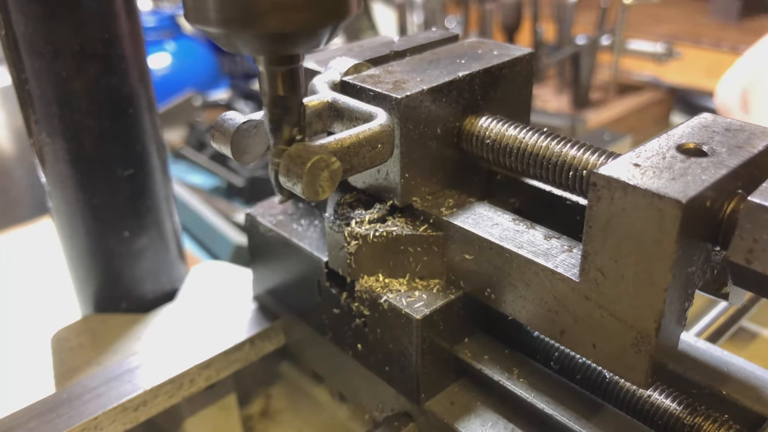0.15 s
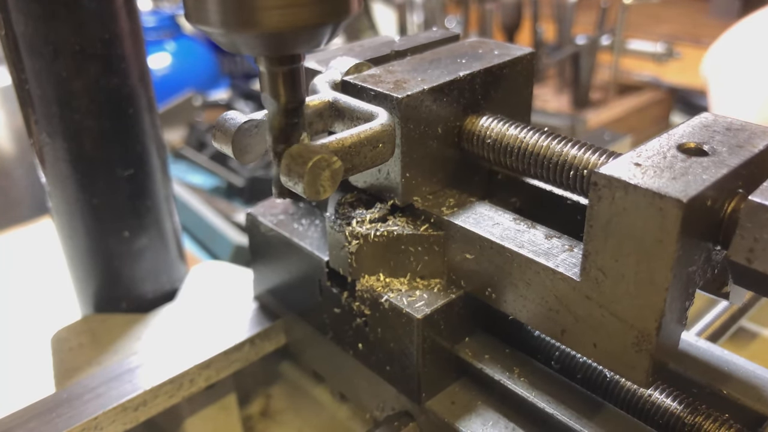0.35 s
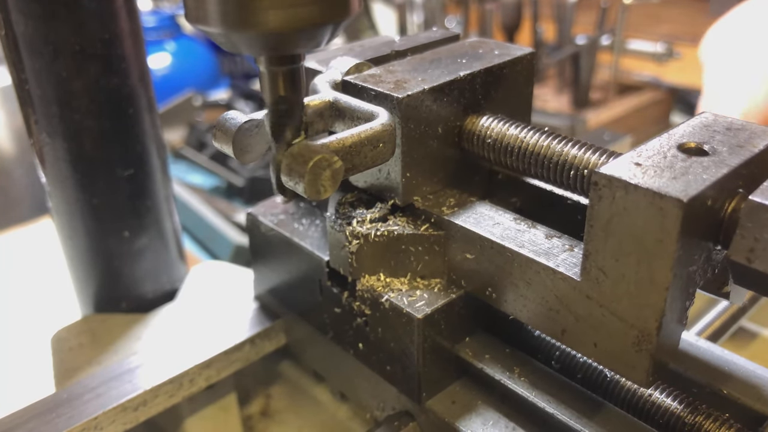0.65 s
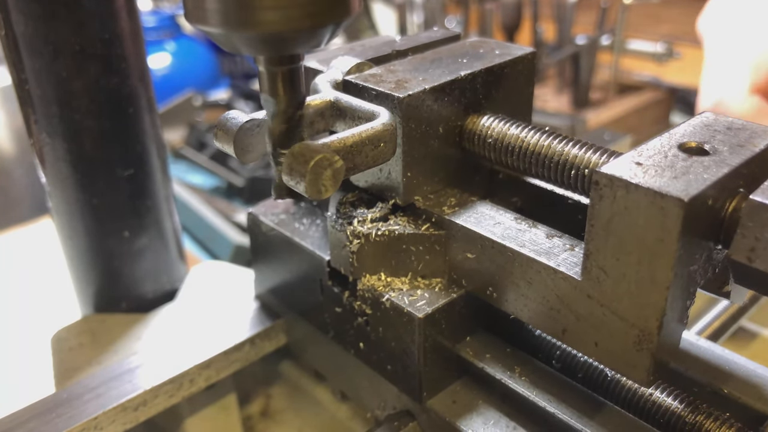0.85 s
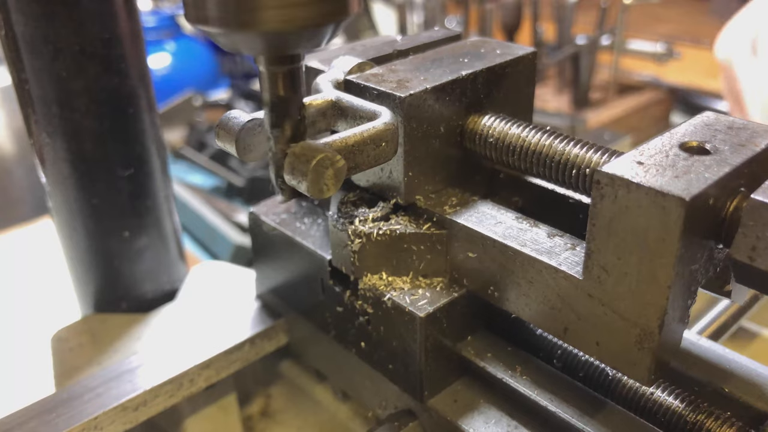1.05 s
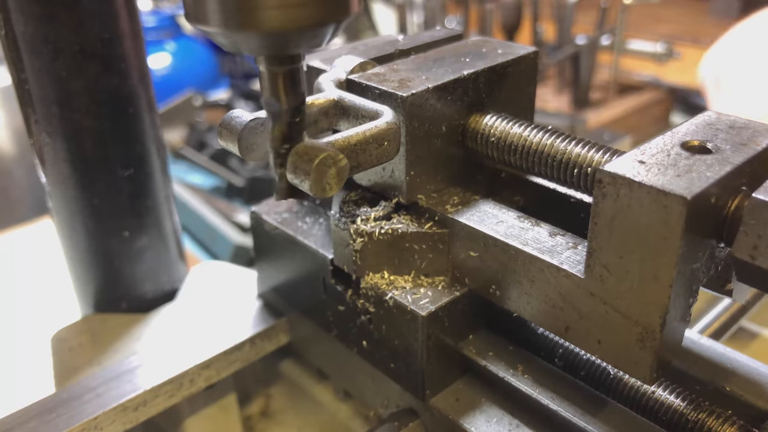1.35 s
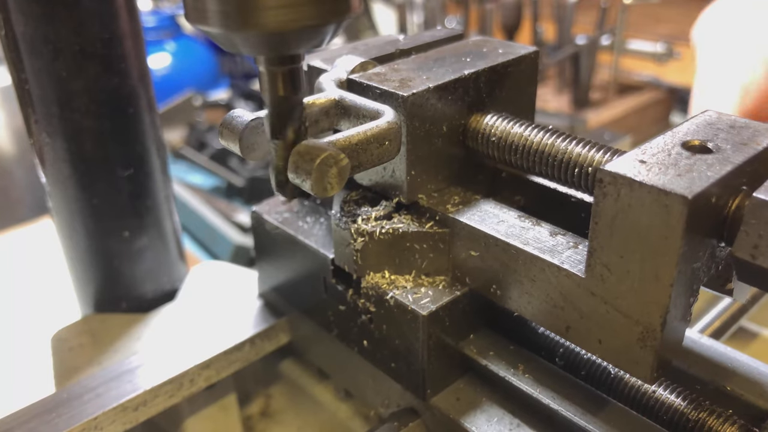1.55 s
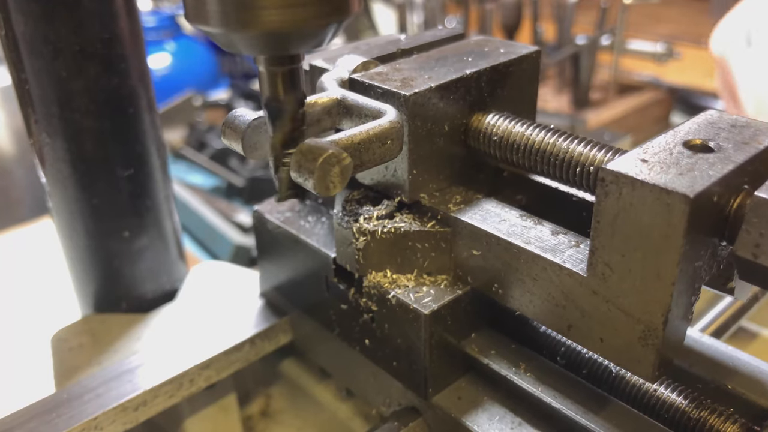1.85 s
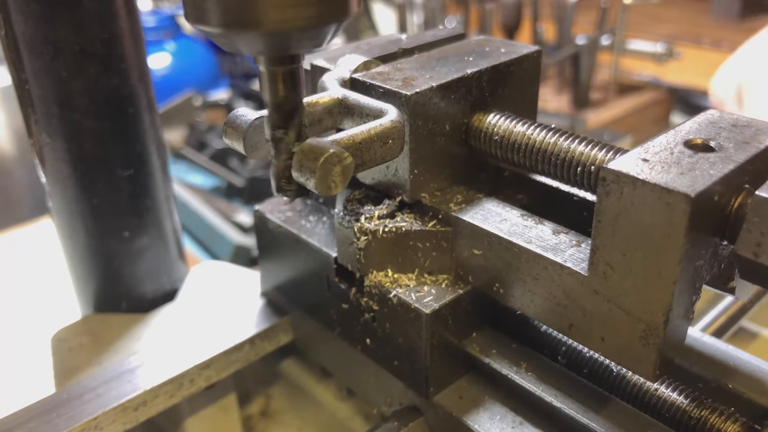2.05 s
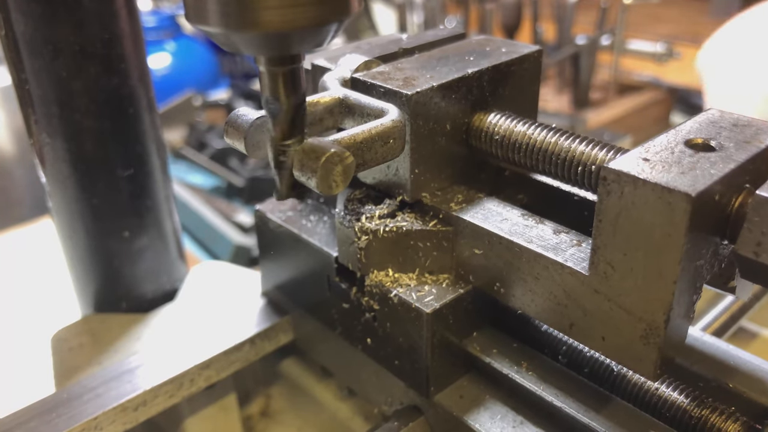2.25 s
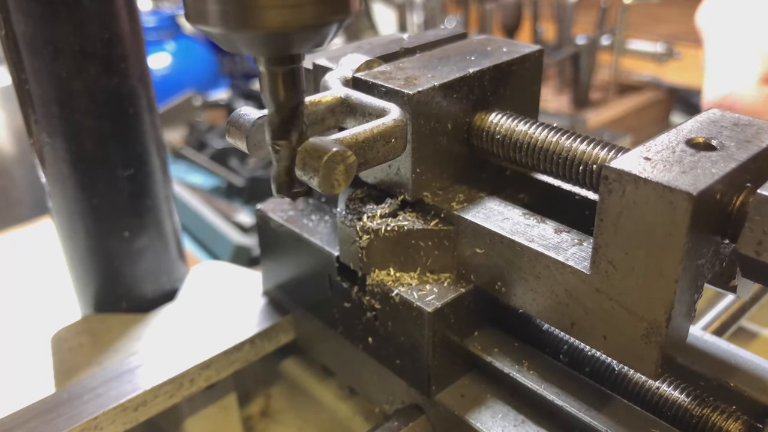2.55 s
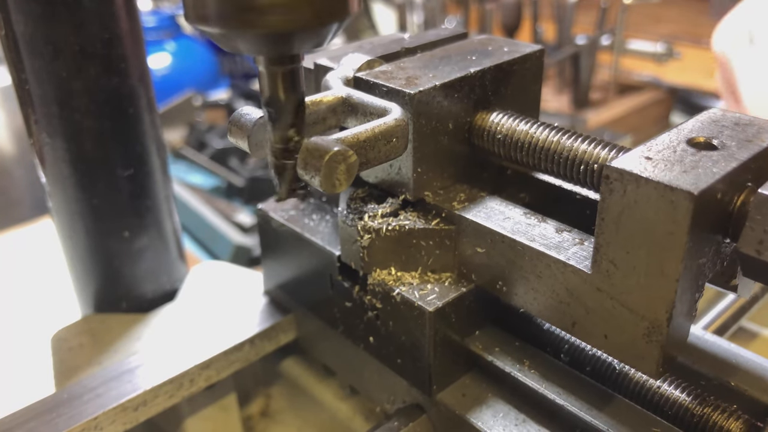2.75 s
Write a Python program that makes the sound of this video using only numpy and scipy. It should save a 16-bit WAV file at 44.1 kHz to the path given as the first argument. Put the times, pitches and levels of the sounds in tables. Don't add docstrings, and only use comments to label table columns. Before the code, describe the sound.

Milling cutter bites a small metal part about seven times a second over a humming, whining motor

```python
import sys
import numpy as np
from scipy import signal
from scipy.fft import rfft, irfft
from scipy.io import wavfile
from scipy.ndimage import uniform_filter1d

SR = 44100
rng = np.random.default_rng(int(sys.argv[2]) if len(sys.argv) > 2 else 0)


def boost(x):
    u = np.asarray(x, float) / 20
    return 10 ** u


def master_out(mix):
    frames = np.transpose(np.atleast_2d(mix))
    ceiling = np.clip(frames, -1, 1)
    pcm = np.round(ceiling * 32767).astype(np.int16)
    wavfile.write(sys.argv[1], SR, pcm)


N = 127890
T = np.arange(N) / SR
MEAN_SHAFT_HZ = 47.063


def evened(x):
    return x / np.sqrt(np.mean(x ** 2) + 1e-20)


def slow(hz):
    drift = signal.lfilter([1], [1, -np.exp(-2 * np.pi * hz / SR)], rng.standard_normal(N + SR))
    return evened(drift[SR:])


def coloured(x, points):
    f, level_db = np.transpose(points)
    hz = np.fft.rfftfreq(N, 1 / SR)
    gain_db = np.interp(np.log(hz + 1), np.log(f), level_db, left=-80, right=-80)
    return evened(irfft(rfft(x) * boost(gain_db), N))


def rung(x, peaks):
    hz = np.fft.rfftfreq(N, 1 / SR)
    power = sum(boost(2 * db) / w / (1 + ((hz - f) / w) ** 2) ** 2 for f, w, db in peaks)
    return irfft(rfft(x) * np.sqrt(power * SR / np.pi), N)


def firm(peaks, window_s):
    x = rung(rng.standard_normal(N), peaks)
    power = uniform_filter1d(x ** 2, max(int(window_s * SR), 1))
    return x * np.std(x) / np.sqrt(power + 1e-12)


def tone(turns, db):
    return np.sqrt(2) * boost(db) * np.sin(2 * np.pi * turns)


def hump(start_s, length_s):
    return np.sin(np.pi * np.clip((T - start_s) / length_s, 0, 1)) ** 2


def puffs(times_s, dbs, t60_s):
    drive, age_s = np.zeros(N), T[:1500]
    drive[np.clip((times_s * SR).astype(int), 0, N - 1)] = boost(dbs)
    envelope = np.minimum(age_s / 0.0023, 1) * boost(-60 * age_s / t60_s)
    return signal.oaconvolve(drive, envelope)[:N] * rng.standard_normal(N)


def shaft_turns():
    # start in seconds, speed jump in Hz.
    surges = [
        (-.03, 0.077),
        (.085, 0.17),
        (0.429, 0.2007),
        (.79, 0.142),
        (1.13, 0.079),
        (1.48, 0.098),
        (1.79, 0.058),
        (2.13, 0.079),
        (2.491, 0.147),
        (2.85, 0.27),
    ]
    rise_s, sag_s = 0.025, .17
    drag_hz, drag_s = 0.0503, 0.1205
    hz = 47.005 + .02 * slow(23.0)
    for start_s, jump_hz in surges:
        age_s = np.maximum(T - start_s, 0)
        hz = hz + jump_hz * np.minimum(age_s / rise_s, 1) * np.exp(-age_s / sag_s)
        hz = hz + 0.44 * jump_hz * hump(start_s, 0.0887)
        hz = hz - drag_hz * hump(start_s - drag_s * 0.85, drag_s)
    turns = np.cumsum(hz) / SR
    return turns - np.mean(turns - MEAN_SHAFT_HZ * T) + .73


def motor_hum(mains):
    orders = (1, 2, 3, 4, 5, 6, 7, 8, 9, 15, 23, 24, 25, 26, 27, 29, 30, 31, 32, 33, 36, 57, 58)
    levels_db = [-61, -49, -30, -43, -54, -62, -61, -55, -45, -60, -63, -62, -63, -58, -62, -68, -71, -68,
                 -62, -64, -65, -61, -68]
    out = np.zeros(N)
    for k, db in zip(orders, levels_db):
        phase = 0.58 * (k in (6, 9)) + (k > 9) * 0.077 * rng.standard_normal()
        out += tone(k * mains + phase, db)
    return out


def mixed_tones(shaft, mains):
    mixes = ((1, 0), (1, 2), (-1, 4), (1, 3), (-1, 6), (13, -10), (10, -4), (1, 9), (12, -2), (12, 3),
             (14, 0), (15, 0), (13, 3), (14, 2), (24, 3), (34, 0), (8, 1), (24, -3), (13, -3), (16, 0),
             (40, 3), (47, -3), (49, 1), (176, -1), (216, 1))
    levels_db = [-57, -57, -59, -65, -66, -73, -64, -56, -61, -55, -54, -62, -63, -62, -63, -65, -67, -61,
                 -61, -63, -62, -64, -64, -64, -64]
    out = np.zeros(N)
    for (a, b), db in zip(mixes, levels_db):
        out += tone(a * shaft + b * mains + (a > 1) * rng.random(), db)
    return out


def slot_whine(shaft, mains):
    orders = (12, 24, 36, 48, 60, 72, 96, 105, 113, 120, 144, 168, 175, 190, 217)
    # centre, mains below, mains above, twice the mains off, all in dB.
    levels_db = [(-49, -65, -64, -78), (-53, -69, -65, -64), (-55, -72, -69, -78), (-64, -73, -65, -65),
                 (-58, -71, -72, -78), (-57, -72, -62, -78), (-51, -60, -54, -60), (-62, -65, -63, -69),
                 (-65, -67, -72, -76), (-46, -50, -53, -56), (-69, -70, -71, -75), (-68, -68, -68, -71),
                 (-63.5, -65, -66, -69), (-66, -67, -67, -70), (-66, -67, -67, -70)]
    depths = (.1, .07, .08, .06)
    runout = sum(depth * np.cos(2 * np.pi * (j + 1) * shaft + j) for j, depth in enumerate(depths))
    out = np.zeros(N)
    for k, (db, low_db, high_db, far_db) in zip(orders, levels_db):
        centre = k * shaft + rng.random()
        stronger_side = np.sign(high_db - low_db + .5)
        family = tone(centre, db) + tone(centre - mains + .5, low_db) + tone(centre + mains, high_db)
        family += tone(centre + 2 * stronger_side * mains, far_db)
        out += family * boost(.5 * slow(4.5)) * (1 + (k > 50) * runout)
    return out


def gears(shaft):
    # frequency in Hz, level in dB.
    gear_lines = [(1663.8, -62), (1800.7, -58), (1829.6, -62), (1901.3, -69), (2002.8, -66), (2031.7, -58),
                  (2034.7, -61), (2060.6, -60), (2180.2, -63), (2291.6, -64), (2327.9, -59), (2356.9, -61),
                  (2558.9, -64), (2587.9, -64)]
    # frequency in Hz, width in Hz, level in dB.
    housing = [(439, 134, -53), (733, 56, -52.5), (1680, 70, -64), (1820, 50, -54.5), (2083, 85, -55.5),
               (2267, 160, -52), (2640, 250, -50), (2856, 35, -57.5), (3300, 230, -64.5), (4040, 71, -66),
               (4900, 130, -63)]
    # frequency in Hz, level in dB.
    roar = [(40, -18), (230, -10.5), (450, -4.5), (800, -7), (950, -10), (1500, -10.5), (2900, -10),
            (3500, -19.5)]
    mesh_hz, mesh_depth, roar_db = 233.7, 0.24, -45.5
    t = T + .5 * (shaft / MEAN_SHAFT_HZ - T)
    lines = sum(tone(f * t + rng.random(), db) for f, db in gear_lines)
    rattle = evened(rng.standard_normal(N) * (1 + mesh_depth * np.cos(2 * np.pi * mesh_hz * T)))
    return lines + rung(rattle, housing) + boost(roar_db) * coloured(rng.standard_normal(N), roar)


def brushes(shaft, mains):
    # frequency in Hz, level in dB.
    hiss = [(3000, -15), (4200, -14), (7000, -4), (10000, -5.5), (11800, -6), (12600, -8.5), (15300, -15.5),
            (16500, -6)]
    # frequency in Hz, width in Hz, level in dB.
    shell = [(5280, 49, -66.5), (5600, 75, -63), (7450, 140, -62), (8250, 62, -68.5), (9300, 170, -75.5),
             (9400, 180, -78), (10560, 140, -58.5), (11360, 130, -66), (11280, 150, -60.5),
             (12130, 130, -87), (13600, 270, -66), (14200, 350, -71), (16000, 270, -76)]
    hiss_db, steady_db, throb_depth = -46.5, -50.5, 0.16
    flicker_db, swell_db, rise_db_per_s = 0.5, 0.63, .5
    phases = (shaft, 2 * shaft, 4 * shaft, 8 * shaft, shaft, 3 * shaft / 4, shaft / 4, mains)
    throb = sum(np.cos(2 * np.pi * (p + rng.random())) for p in phases)
    drift_db = flicker_db * slow(23.0) + swell_db * slow(1.3) + rise_db_per_s * T
    throbbing = np.maximum(1 + throb_depth * throb / 2, 0)
    fizz = evened(rng.standard_normal(N) * boost(drift_db) * throbbing)
    steady = coloured(rng.standard_normal(N), [(3400, -8.5), (4200, 2), (6500, -1.0), (7500, -11)])
    return boost(steady_db) * steady + boost(hiss_db) * coloured(fizz, hiss) + rung(fizz, shell)


def cutter():
    # grind, scrape, ring, all in dB.
    bites = [(-49, -44.0, -48.5), (-59, -44, -48), (-47, -45.5, -55), (-50, -44.5, -48.3),
             (-57, -44.6, -46.1), (-66, -47.3, -45), (-50, -44, -46.6), (-54, -44.5, -48),
             (-49, -43.5, -42.5), (-48, -47, -48), (-50, -44, -47), (-50, -43.2, -42.7),
             (-44.5, -45.5, -45.2), (-45, -43.5, -46.2), (-47.4, -42.5, -47), (-46, -45.2, -52),
             (-49, -44, -48.9), (-48, -44, -48.1), (-45.5, -46.2, -50), (-44.5, -45.5, -50.7)]
    # frequency in Hz, width in Hz, level in dB.
    vice = [(970, 64, 1)]
    # frequency in Hz, width in Hz, level in dB.
    part = [(707, 81, -2), (1318, 100, -4), (2300, 130, -11), (2600, 190, -0.5), (3060, 260, -15.5)]
    spindle_hz, bite_s, bite_len_s, dip = 6.94, 0.005, 0.062, 0.93
    ring_s, ring_len_s = 0.0285, 0.017
    grind_gain_db, ring_gain_db, bright_db = 3, 3.5, -12
    scrape, grind, ring = np.zeros((3, N))
    for k, (grind_db, scrape_db, ring_db) in enumerate(bites):
        start_s = k / spindle_hz + bite_s
        between = hump(start_s + bite_len_s * 0.32, bite_len_s * 0.31)
        bite = np.sqrt(hump(start_s, bite_len_s)) * (1 - dip * between)
        scrape += boost(scrape_db) * bite
        grind += boost(grind_db + grind_gain_db) * bite
        ring += boost(ring_db + ring_gain_db) * hump(k / spindle_hz + ring_s, ring_len_s)
    rough, clang, bright = rng.standard_normal((3, N))
    out = scrape * firm(vice, 0.0065) * boost(4.5) + rung(rough * scrape, part)
    out += grind * firm([(445, 73, -0.5), (331, 37, 1.0)], 0.0078)
    out += ring * firm([(7280, 150, 0.)], .003) + rung(clang * ring, [(4860, 150, -10.5)])
    return out + boost(bright_db) * ring * coloured(bright, [(3000, -12), (6500, -21), (12000, 4)])


def vice_thumps():
    # centre in seconds, level in dB, frequency in Hz.
    knocks = [(0.025, -33.4, 427), (0.036, -34.0, 404), (0.049, -38, 420), (0.066, -40, 476),
              (0.164, -32, 425), (0.201, -30, 440), (0.312, -41, 426), (0.336, -29, 470), (0.454, -41, 420),
              (0.483, -33.5, 486), (0.606, -38, 480), (0.639, -37, 480), (0.737, -38, 434),
              (0.755, -36.5, 439), (0.896, -41, 387), (0.925, -48, 434), (1.037, -35.2, 470),
              (1.049, -30, 446), (1.073, -32, 440), (1.18, -32.5, 460), (1.196, -33.5, 429),
              (1.215, -39, 464), (1.333, -39, 455), (1.345, -34, 452), (1.49, -34, 460), (1.603, -43, 441),
              (1.62, -40, 407), (1.633, -42, 515), (1.645, -37.8, 409), (1.766, -42, 440),
              (1.781, -44, 445), (1.91, -43, 406), (1.931, -33, 460), (1.944, -43, 446), (2.032, -48, 385),
              (2.046, -48, 410), (2.06, -31.5, 487), (2.081, -49, 420), (2.202, -40, 441),
              (2.328, -37, 460), (2.347, -43, 437), (2.482, -38.5, 387), (2.503, -41.4, 431),
              (2.516, -40.6, 423), (2.562, -50, 470), (2.626, -37.7, 376), (2.646, -39.2, 433),
              (2.661, -36, 390), (2.77, -36.1, 440), (2.788, -33.5, 490)]
    length_s = 0.022
    out = np.zeros(N)
    for s, db, hz in knocks:
        out += hump(s - length_s / 2, length_s) * tone(hz * (T - s), db)
    return out


def shaft_and_seam_ticks(shaft):
    # time in seconds, level in dB.
    loud_seam_ticks = [
        (1.271, -31),
        (1.528, -33),
        (2.379, -45),
        (2.632, -32),
        (2.886, -30),
    ]
    belt_s, belt_db, brush_db, spread_db = 1.271, -41, -47.5, 2.5
    turn = shaft - shaft[int(belt_s * SR)]
    at = np.flatnonzero(np.diff(np.floor(turn))) + 1
    seam_s = at[np.round(turn[at]) % 4 == 0] / SR
    luck_db = spread_db * rng.standard_normal((len(at), 2))
    brush = puffs(at / SR - .004, brush_db + luck_db[:, 1], 0.041)
    seam_db = belt_db + 1.5 * seam_s + .4 * luck_db[:len(seam_s), 0]
    bright = puffs(seam_s, seam_db, 0.031) + puffs(*np.transpose(loud_seam_ticks), 0.022)
    steel = [(10630, 300, -2.5), (9400, 220, -10), (11400, 440, -6.5), (8400, 200, -12)]
    return rung(brush, [(8200, 120, -0.5), (7190, 150, -6.5)]) + rung(bright, steel)


def scene():
    shaft = shaft_turns()
    mains = 49.96 * T + .27
    mix = motor_hum(mains) + mixed_tones(shaft, mains) + slot_whine(shaft, mains)
    mix += gears(shaft) + brushes(shaft, mains)
    mix += cutter() + vice_thumps() + shaft_and_seam_ticks(shaft)
    return np.array([mix, mix])


def unlinked(dry):
    # start in seconds, low edge in Hz, high edge in Hz.
    slips = [
        (.047, 4150, 5750),
        (.047, 6900, 8250),
        (.047, 9650, 11000),
        (.047, 12450, 13750),
        (1.185, 5700, 6850),
    ]
    hz, out = np.fft.rfftfreq(N, 1 / SR), dry
    for s, low_hz, high_hz in slips:
        sources = np.vstack([dry[:1], rng.standard_normal((2, N))])
        band = irfft(rfft(sources) * ((hz > low_hz) & (hz < high_hz)), N)
        noise = .85 * band[1:] * np.std(band[0]) / np.std(band[1])
        out = out + np.sqrt(hump(s, .046)) * (noise - band[0])
    return out


def band_limit(x):
    return signal.sosfilt(signal.butter(12, 15780, fs=SR, output="sos"), x)


def record(dry):
    mix = unlinked(dry)
    return band_limit(mix)


dry = scene()
out = record(dry)
master_out(out)
```